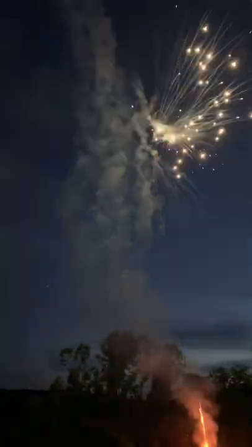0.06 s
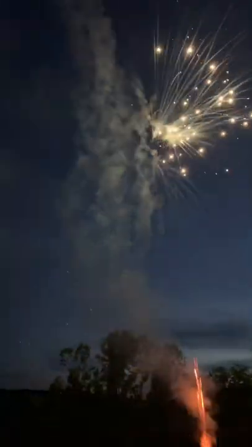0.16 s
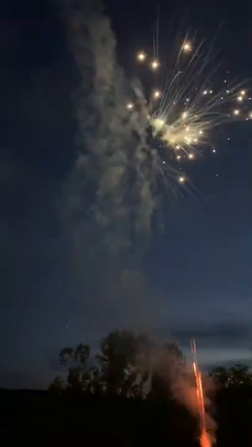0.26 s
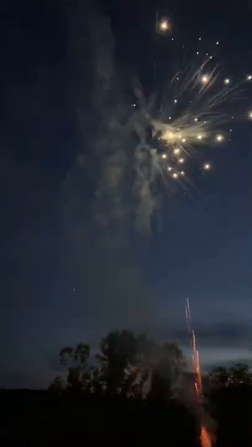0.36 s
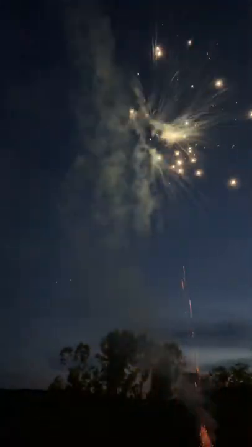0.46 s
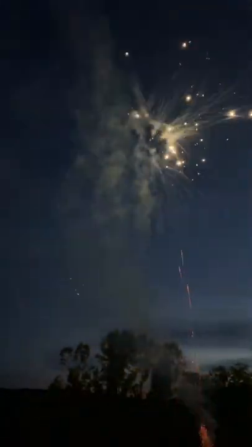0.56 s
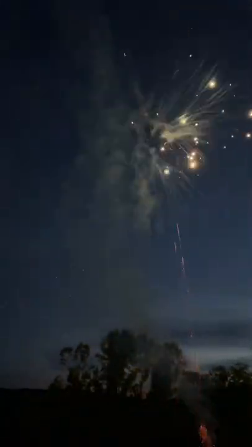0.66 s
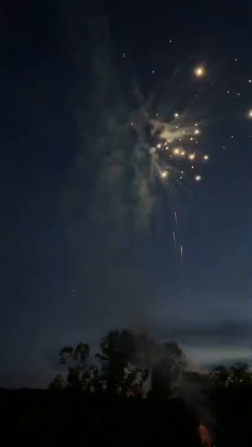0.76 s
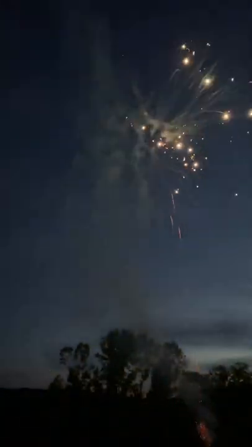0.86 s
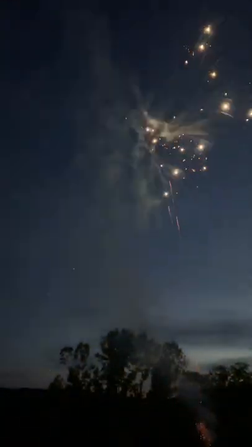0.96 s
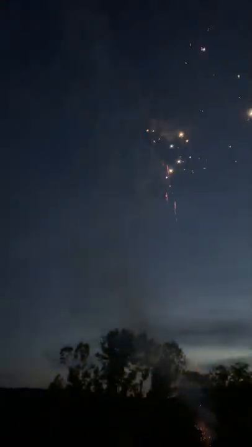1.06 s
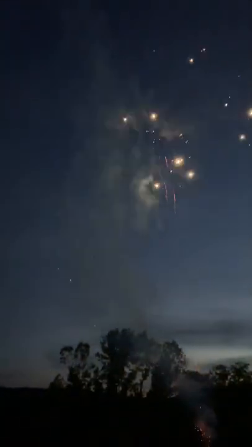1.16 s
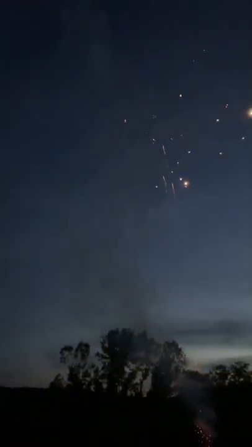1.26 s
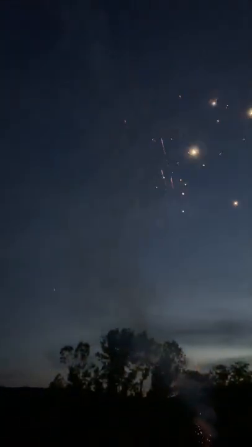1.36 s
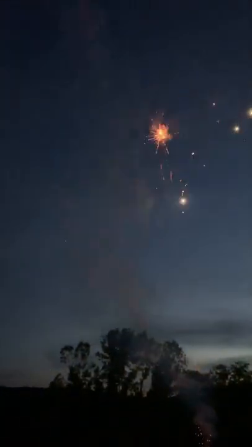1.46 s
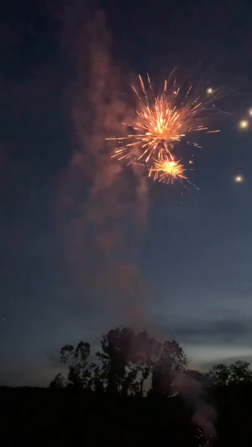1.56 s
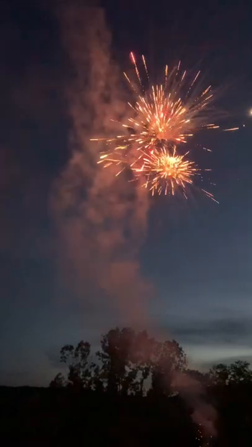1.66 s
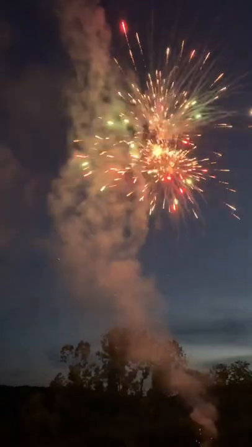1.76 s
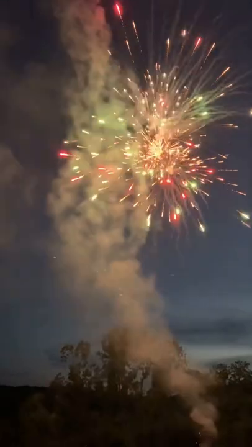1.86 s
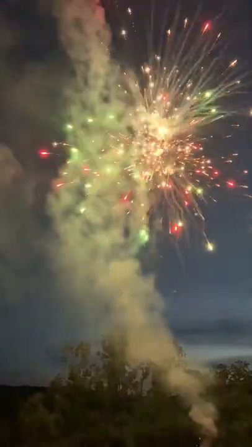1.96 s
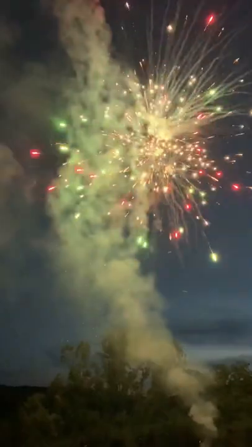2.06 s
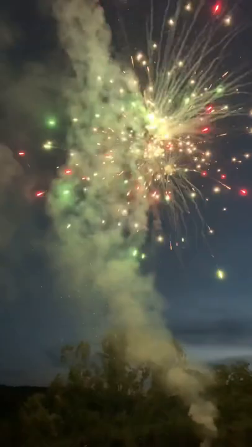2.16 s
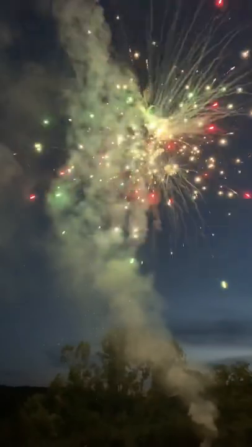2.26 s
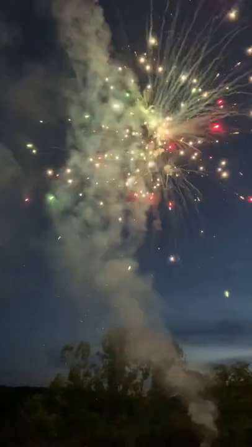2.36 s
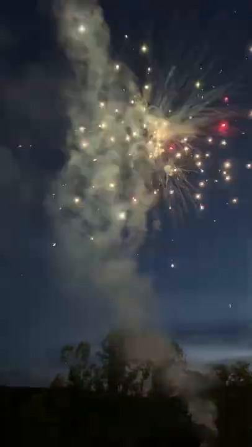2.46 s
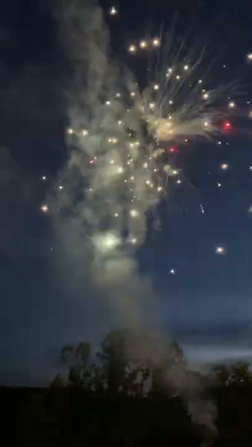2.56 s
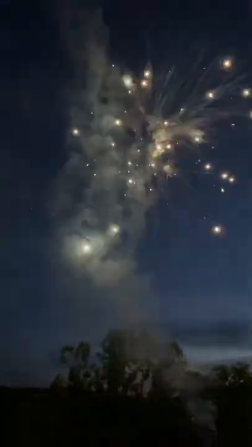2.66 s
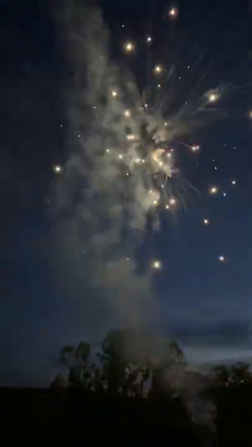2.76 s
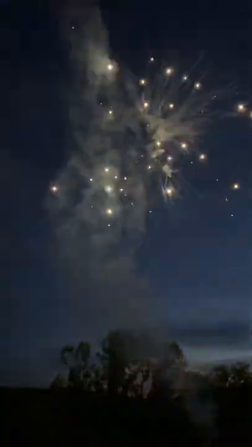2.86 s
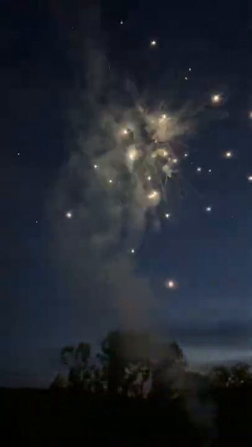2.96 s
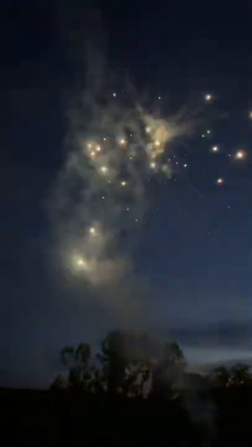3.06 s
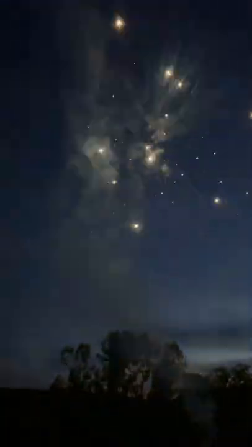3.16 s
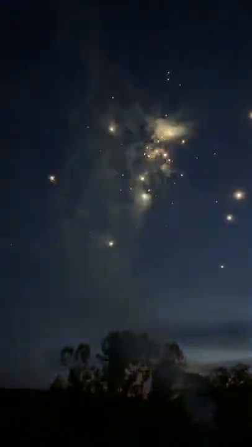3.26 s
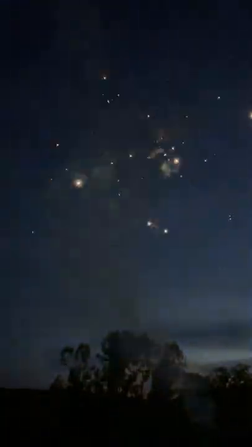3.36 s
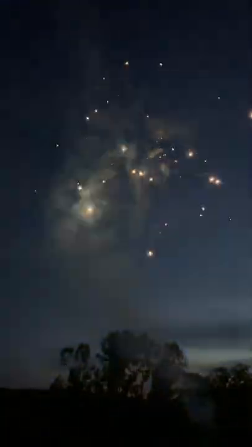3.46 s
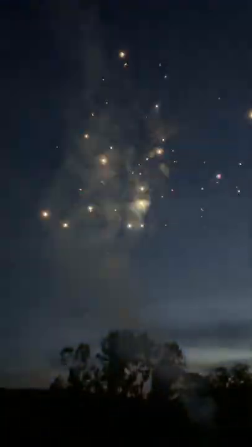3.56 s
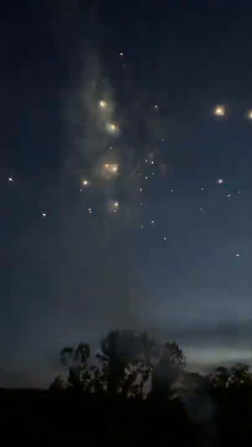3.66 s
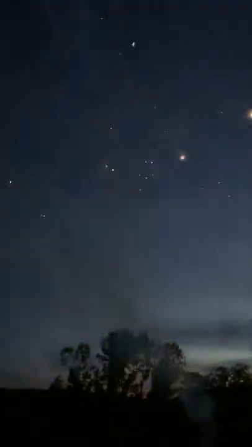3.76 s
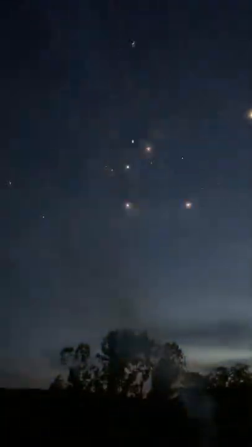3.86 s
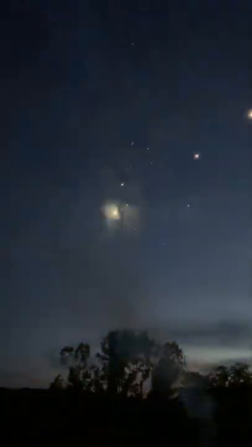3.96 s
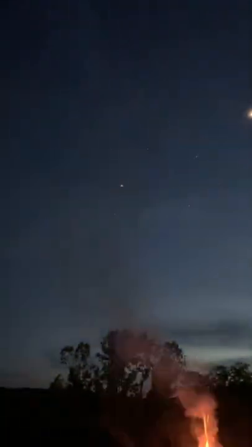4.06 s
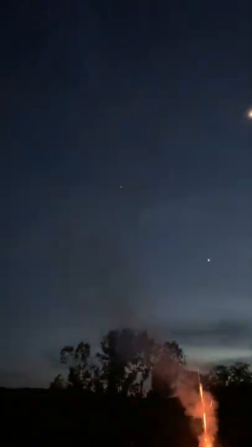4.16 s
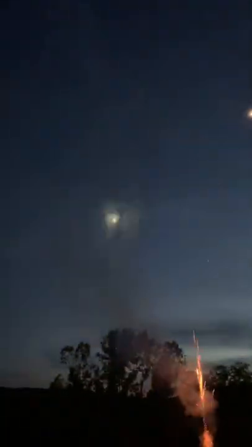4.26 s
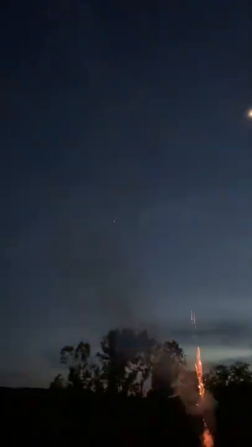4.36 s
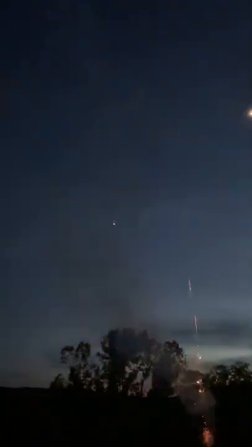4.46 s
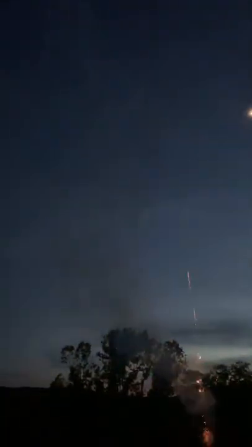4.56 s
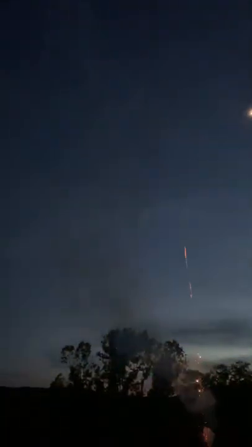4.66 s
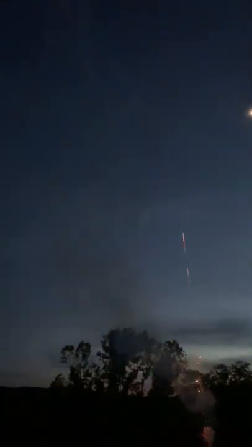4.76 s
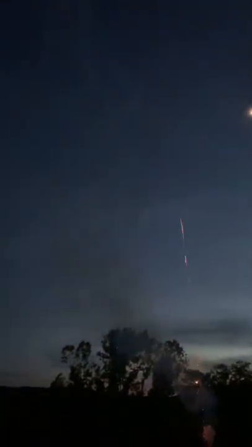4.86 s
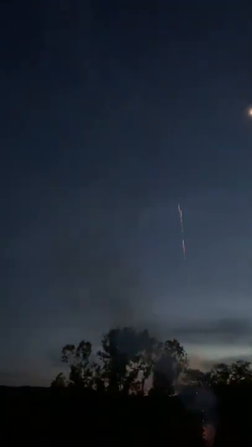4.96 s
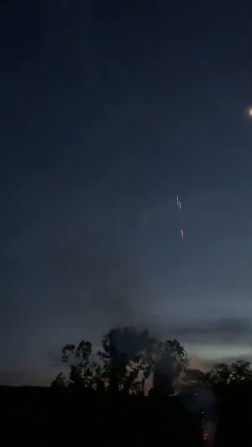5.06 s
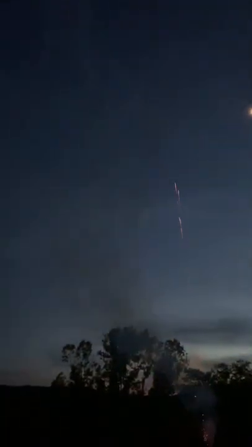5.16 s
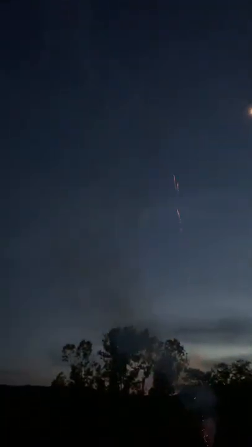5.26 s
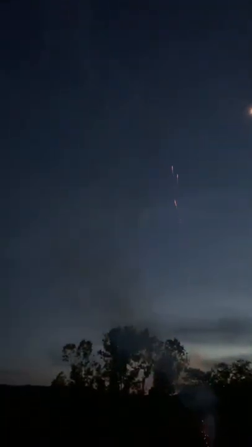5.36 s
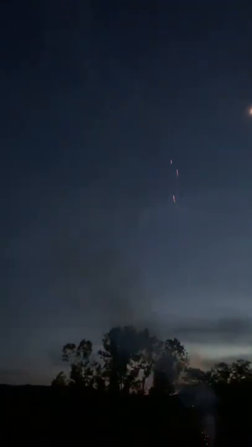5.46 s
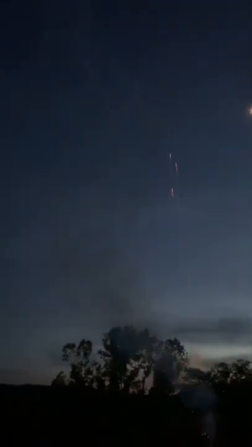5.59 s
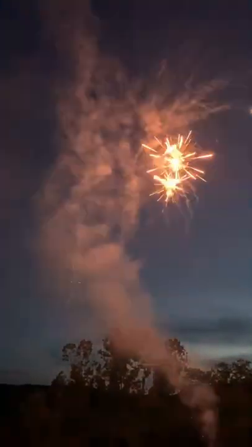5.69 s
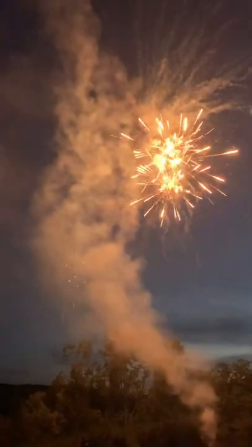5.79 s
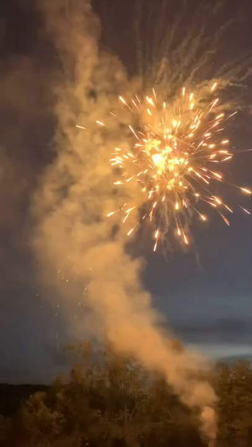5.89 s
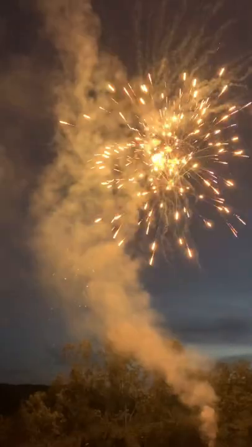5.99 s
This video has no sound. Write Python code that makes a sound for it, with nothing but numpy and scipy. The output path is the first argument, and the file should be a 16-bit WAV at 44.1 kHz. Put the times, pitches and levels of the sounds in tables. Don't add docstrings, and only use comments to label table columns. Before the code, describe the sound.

Outdoor fireworks at the edge of a field, caught by a handheld stereo phone. Three hard thumps in quick succession open it, with short bright echoes. After a quieter gap with tiny snaps, several heavy bursts explode overhead, the loudest last, and their boom rolls away over trees and slopes. A weaker triple thump follows, then another overlapping burst cluster cut off at the end.

```python
import sys
import numpy as np
from scipy import signal
from scipy.fft import rfft, irfft, next_fast_len
from scipy.io import wavfile
from scipy.ndimage import uniform_filter1d

SR = 44100
rng = np.random.default_rng(int(sys.argv[2]) if len(sys.argv) > 2 else 0)


def boost(x):
    u = np.asarray(x, float) / 20
    return 10 ** u


def pcm_store(signal):
    levels = np.round(np.clip(np.atleast_2d(signal), -1, 1) * 32767)
    wavfile.write(sys.argv[1], SR, levels.astype(np.int16).T)


N = 265923
HZ = np.fft.rfftfreq(next_fast_len(N + SR), 1 / SR)
PORT_GAP_MS, PORT_MIX_HZ = 0.185, 1600

# (time [s], blast level [dB], ground echo re blast [dB], crack [dB], sent to landscape [dB])
LIFTS = [
    (0.0194, 4, -6, 7, 4.8),
    (0.066, 6, -7, 0.5, -2.3),
    (0.1167, 0, -1.5, -7.5, -11.7),
    (4.0275, -3.5, -5.5, -1.5, 3.9),
    (4.081, -1, -5.5, 2, 2.6),
    (4.1293, -7, -5, -1.5, -15.3),
]
# (time [s], blast level [dB], ground echo re blast [dB], crack [dB], sent to landscape [dB])
BURSTS = [
    (1.4952, -4, 2, -12, -13.5),
    (1.5035, 0, 9, -15.5, -1.5),
    (1.5946, 3.5, 2.5, 0, -1.5),
    (1.8135, 8, -9, -3.5, 1.5),
    (5.7206, -6.5, 16, -12.5, 2),
    (5.7453, 5, 0, -2.5, 0.1),
    (5.7866, 4, -6, 3, -4),
]
# (time [s], sent to landscape [dB])
EARLIER_LIFT = [(-0.18, -17.5)]

# (frequency [Hz], level [dB])
LIFT_COLOUR = [(30, -12.5), (80, 3.5), (200, 9), (380, 5), (800, -1.5), (1500, -12), (2500, -7.5),
               (4000, -5), (6500, -2), (10000, -3.5), (13000, 2), (15500, -7), (16600, -15)]
# (frequency [Hz], level [dB])
BURST_COLOUR = [(30, -6.5), (80, 0), (200, 11.5), (350, 5.5), (800, -6), (1100, -2.5), (1600, -1),
                (3500, -7), (6500, -4.5), (10000, -5), (13000, 1), (15500, 0.5), (16600, -15)]
# (delay [ms], left gain [1], right gain [1], dulled above [Hz])
LIFT_PATHS = [(0, 0.75, 1.19, 100000), (.8, 0.62, 0.081, 27000), (1.7, -0.61, 0.21, 1500),
              (7.8, -0.1, 0.046, 2300), (18, -0.083, 0.076, 300)]
# (delay [ms], left gain [1], right gain [1], dulled above [Hz])
BURST_PATHS = [(0, 0.77, 0.93, 90000), (1.35, 0.38, 0.16, 5000), (2.2, 0.17, -0.22, 3900),
               (7.5, 0.033, 0.092, 1400), (13, 0.052, 0.22, 900)]
# (time [s], level [dB])
LIFT_WALLS = [(.349, -17), (.398, -22.5), (0.448, -26), (4.359, -30), (4.412, -51)]
# (time [s], level [dB])
BURST_WALLS = [(1.775, -15), (1.864, -20), (2.04, -15.5), (2.081, -7.5), (2.151, -13), (2.27, -24),
               (2.573, -21), (5.992, -13), (6.015, -10.5)]
# (level [dB], length [ms])
LIFT_FORERUNNERS = [(-21.5, 6.6), (-16, 2.4), (-19.5, 3.3), (-26.5, 4.4), (-26.5, 1.8), (-25, 1.8)]
# (level [dB], length [ms])
BURST_FORERUNNERS = [(-15, 8.3), (-11, 9), (-14, 4.8), (-17.5, 8.5), (-13, 6.3), (-12, 2.2), (-16, 2.2)]

# (delay [s], rise [s], five band levels [dB], five band fades [dB/s]),
# the bands being rumble, boom, clatter, rustle and hiss
LIFT_ECHOES = [
    (.1, .03, [-54, -44, -39, -41, -41.5], [40, 60, 70, 95, 95]),
    (.31, .02, [-58, -50.5, -55, -60, -66.5], [50, 50, 50, 50, 60]),
    (.45, .05, [-70.5, -61, -59.5, -76, -75.5], [19, 19, 19, 22, 22]),
]
# (delay [s], rise [s], five band levels [dB], five band fades [dB/s])
BURST_ECHOES = [
    (.06, .03, [-50.5, -37, -43.5, -45.5, -43], [25, 30, 30.1, 30, 37.8]),
    (.25, 0.023, [-45.5, -33.5, -39.5, -45, -54], [31, 25.84, 35, 40, 51]),
    (.4, .06, [-58, -39, -50, -59, -79], [6, 15, 9.8, 8.6, 17]),
]
EVENING_DB = [-59, -57.5, -59.5, -79.5, -80]
EVENING_FOLLOWS = [.55, 0.18, 0.87, 0.27, 0.61]
# (time [s], gain [dB])
SLOW_GAIN = [(0, 11.5), (.25, 10.5), (.4, 10), (.9, 11.5), (1.47, 13.5), (1.53, 3.5), (1.8, 2.5),
             (2.1, 0.66), (3.2, -4), (3.98, -3), (4.1, 1.4), (4.6, -2.9), (5.68, -5), (5.76, 2),
             (6.03, -0.75)]

# (frequency [Hz], level [dB per Hz])
AFTER_LIFT = [(130, 0), (266, 2), (340, -1.5), (469, -4.5), (599, -15), (934, -11.5), (1730, -15.5),
              (3000, -30), (4300, -22.5), (7040, -32), (9000, -33)]
# (frequency [Hz], level [dB per Hz])
AFTER_BURST = [(54, -23), (144, -9), (286, -4), (678, -11), (1690, -19.5), (3000, -32), (4300, -25.5),
               (7040, -32)]
# (frequency [Hz], level [dB per Hz])
RUMBLE_COLOUR = [(22, -41.5), (40, -13.5), (58, 1.5), (90, -5.5), (140, -9), (190, -24), (300, -66.5)]
# (frequency [Hz], level [dB])
CLOUD_COLOUR = [(7000, 2.5), (9000, -0.5), (10500, -8.5), (12500, -9), (14000, -11.5), (15300, -13.5),
                (15900, -61), (16150, -91)]
CLOUD_EDGES_HZ = (150, 600, 2100, 4400)
# (frequency [Hz], likeness [1])
PORT_LIKENESS = [(60, .98), (150, .95), (300, .85), (640, .35), (1400, .45), (3000, .55), (4500, .8),
                 (6000, .993), (9000, .997)]
# (frequency [Hz], left minus right [dB])
LEFT_DB = [(60, -1.1), (180, -2.1), (550, -4), (1650, .4), (4000, -.4), (6500, .05)]

# (time [s], peak level [dB],
# pitch [Hz], tail level [dB])
SNAPS = [(0.3487, -28, 6540, -6), (0.7115, -26, 7440, -17), (1.112, -44.5, 5440, -36),
         (1.2297, -22, 11200, -16.5), (3.1594, -57, 6100, -22), (3.3398, -65, 5040, -19),
         (3.701, -53, 6360, -8), (4.276, -40, 12300, -23), (4.3905, -33.5, 11100, -18),
         (4.876, -51.5, 6860, -11), (5.272, -63, 7000, -16), (5.3094, -64.5, 5590, -21)]


def evened(x):
    return x / np.sqrt(np.mean(x ** 2) + 1e-20)


def read(points, hz):
    f, value = np.transpose(points)
    return np.interp(np.log(hz + 1), np.log(f + 1), value)


def add(mix, s, sound):
    at = round(s * SR)
    heard = sound[..., max(-at, 0):]
    part = mix[..., max(at, 0):][..., :heard.shape[-1]]
    part += heard[..., :part.shape[-1]]


def filtered(x, gain):
    size = 2 * len(HZ) - 2
    return irfft(rfft(x, size) * gain, size)[..., :N]


def port_lead():
    above_hz = (HZ ** 4 + PORT_MIX_HZ ** 4) ** 0.25 - PORT_MIX_HZ
    return np.exp(2j * np.pi * above_hz * PORT_GAP_MS / 1000)


def rumble(level):
    a, b = rng.standard_normal((2, N))
    ports = np.array([a + 0.36 * b, a])
    return level * evened(filtered(ports, boost(read(RUMBLE_COLOUR, HZ))))


def forerunner(level_db, length_ms):
    ms = np.arange(-1200, 200) / SR * 1000
    swell = np.exp(-(ms / np.where(ms < 0, length_ms, 0.9)) ** 2)
    hiss = rng.standard_normal((3, 1400))
    return boost(level_db) * swell * (hiss[0] + 0.9 * hiss[1:])


def blast_wave(push_ms, pull_ms, pull, ring_hz, ring_db, ring_ms):
    ms = np.arange(2000) / SR * 1000
    push = np.exp(-ms / push_ms)
    suction = pull * push_ms / pull_ms ** 2 * ms * np.exp(-ms / pull_ms)
    ring = np.sin(2 * np.pi * ring_hz * ms / 1000) * np.exp(-ms / ring_ms)
    return suction - push + boost(ring_db) * ring


def bushes(front, level_db, fade_ms):
    ms = np.arange(6000) / SR * 1000
    envelope = np.exp(-ms / fade_ms) * np.minimum(ms / 1.3, 1)
    leaves = rng.standard_normal(6000) + 0.39 * rng.standard_normal((2, 6000))
    scattered = signal.fftconvolve(front[None], boost(level_db) * leaves * envelope, axes=1)[:, :N]
    return filtered(scattered, boost(read(CLOUD_COLOUR, HZ)) * (HZ / 2000) ** 0.55)


def blasts(wave, rows, forerunners, colour, paths, ground_ms, walls, wall_hz, scatter_db, scatter_ms):
    soft = signal.lfilter([0.35], [1, -0.65], wave)
    front, wall, early = np.zeros(N), np.zeros(N), np.zeros((2, N))
    for (s, db, ground_db, crack_db, _), (early_db, early_ms) in zip(rows, forerunners):
        blast = soft + boost(crack_db) * (wave - soft)
        add(front, s, boost(db) * blast)
        add(front, s + ground_ms / 1000, boost(db + ground_db) * blast)
        add(early, s - 1200 / SR, forerunner(early_db, early_ms))
    for s, db in walls:
        add(wall, s, boost(db) * wave)
        add(wall, s + ground_ms / 1000, boost(db - 7) * wave)

    out = bushes(front, scatter_db, scatter_ms)
    for delay_ms, left, right, dull_hz in paths:
        delayed = np.roll(front, round(delay_ms * SR / 1000))
        out += filtered(delayed, np.outer([left, right], 1 / (1 + (HZ / dull_hz) ** 2)))
    thin = 1 / (1 + (160 / (HZ + 1)) ** 4)
    out += filtered(wall, thin / (1 + (HZ / wall_hz) ** 2))

    early_low_cut = 1 / (1 + (180 / (HZ + 1)) ** 4)
    early_high_cut = 1 / (1 + (HZ / 8300) ** 30) / (1 + (HZ / 1600) ** 1.95)
    ports = boost(read(colour, HZ)) * np.array([port_lead(), np.ones(len(HZ))])
    return filtered(out, ports) + filtered(early, 4.62 * early_low_cut * early_high_cut)


def lift_charges():
    wave = blast_wave(push_ms=0.33, pull_ms=1.6, pull=0.6, ring_hz=334, ring_db=-23, ring_ms=4.5)
    return blasts(wave, LIFTS, LIFT_FORERUNNERS, LIFT_COLOUR, LIFT_PATHS, ground_ms=2.8,
                  walls=LIFT_WALLS, wall_hz=4000, scatter_db=-41, scatter_ms=50)


def answer(rows, echoes, evening_db=0):
    t = np.arange(0, N + 64, 64) / SR
    gain_db = np.interp(t, *np.transpose(SLOW_GAIN))
    evening = np.add(EVENING_DB, evening_db)[:, None]
    power = boost(2 * (evening + np.outer(EVENING_FOLLOWS, gain_db)))
    for s, *_, sent_db in rows:
        for delay, rise, db, fade in echoes:
            late = t - s - delay
            swell = (t > s) / (1 + np.exp(np.clip(-late / rise, -50, 50)))
            level_db = np.c_[db] + sent_db + gain_db - np.outer(fade, np.maximum(late, 0))
            power = power + swell * boost(2 * level_db)
    return [np.interp(np.arange(N) / SR, t, np.sqrt(band)) for band in power]


def cloud(levels, colour, per_s, spread_db):
    size = boost(spread_db * np.minimum(rng.exponential(1, (2, N)), 5))
    present = rng.random((2, N)) < per_s / SR
    sign = rng.choice([-1.0, 1.0], (2, N))
    a, b = rfft(size * present * sign, 2 * len(HZ) - 2)

    same = np.clip(read(PORT_LIKENESS, HZ), 0, 1)
    left = (same * a + np.sqrt(1 - same ** 2) * b) * port_lead() * boost(read(LEFT_DB, HZ))
    both = np.array([left, a]) * boost(read(colour, HZ) + read(CLOUD_COLOUR, HZ))

    below = [1 / (1 + (HZ / edge) ** 9) for edge in CLOUD_EDGES_HZ] + [1]
    out = np.zeros((2, N))
    for level, low, high in zip(levels, below, below[1:]):
        out += level * evened(irfft(both * (high - low))[:, :N])
    return out


def clumped(x, patchy_db, flicker_db):
    z = signal.stft(x, nperseg=512, noverlap=384)[2]
    chance = rng.standard_normal((z.shape[2], z.shape[1]))
    patches = evened(uniform_filter1d(uniform_filter1d(chance, size=14, axis=0), size=4, axis=1))
    flicker = evened(uniform_filter1d(chance[:, :1], size=5, axis=0))
    gain = boost(patchy_db * patches + flicker_db * flicker).T
    return signal.istft(z * gain, nperseg=512, noverlap=384)[1][:, :N]


def limiter_dip(depth_db=9, recover_s=0.059):
    t, dip_db = np.arange(N) / SR, np.zeros(N)
    for s, db, *_ in LIFTS + BURSTS:
        recovery = (t > s) * np.exp(-abs(t - s) / recover_s)
        dip_db = np.maximum(dip_db, recovery * max(depth_db + 1.2 * db, 0))
    return boost(-uniform_filter1d(dip_db, size=100))


def snaps():
    t, tick, tail = np.arange(3000) / SR, np.zeros(N), np.zeros(N)
    for s, db, hz, tail_db in SNAPS:
        add(tick, s, boost(db + 9) * np.sin(2 * np.pi * hz * t) * np.exp(-t / 0.0001))
        add(tail, s, boost(db + tail_db) * rng.standard_normal(3000) * np.exp(-t / 0.013))
    bright = boost(read(LIFT_COLOUR, HZ)) / (1 + (2300 / (HZ + 1)) ** 4)
    out = tick + filtered(tail, boost(read(CLOUD_COLOUR, HZ)))
    return filtered(out, np.array([bright * port_lead(), bright]))


def air_bursts():
    wave = blast_wave(push_ms=0.37, pull_ms=3.1, pull=0.83, ring_hz=306, ring_db=-12, ring_ms=3.25)
    return blasts(wave, BURSTS, BURST_FORERUNNERS, BURST_COLOUR, BURST_PATHS, ground_ms=2.9,
                  walls=BURST_WALLS, wall_hz=1700, scatter_db=-32, scatter_ms=10.6)


def scene():
    lifted = answer(EARLIER_LIFT + LIFTS, LIFT_ECHOES)
    burst = answer(BURSTS, BURST_ECHOES, evening_db=-8.5)
    echoes = rumble(np.hypot(lifted[0], burst[0]))
    echoes += cloud(lifted[1:], AFTER_LIFT, per_s=4000, spread_db=1.9)
    echoes += cloud(burst[1:], AFTER_BURST, per_s=2500, spread_db=0.98)
    rolling = clumped(echoes, patchy_db=1.8, flicker_db=0.19) * limiter_dip()
    return lift_charges() + rolling + snaps() + air_bursts()


def roll_off(x):
    return signal.sosfilt(signal.butter(12, 16790, fs=SR, output="sos"), x)


def record(dry):
    smear = np.exp(2j * np.pi * 1.9 * np.log((HZ + 700) / (HZ + 65)))
    held = np.tanh(filtered(dry, smear) / 1.048) * 1.29
    held = filtered(held, 1 / (1 + (HZ / 16600) ** 60))
    finished = np.clip(held, -1, 1)
    return roll_off(finished)


dry = scene()
out = record(dry)
pcm_store(out)
```